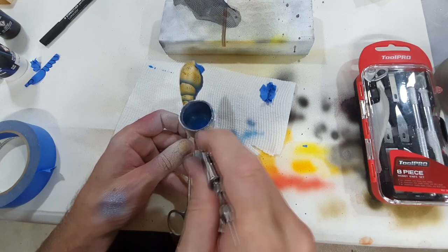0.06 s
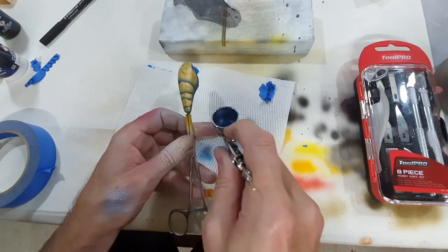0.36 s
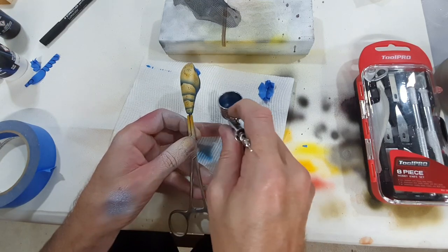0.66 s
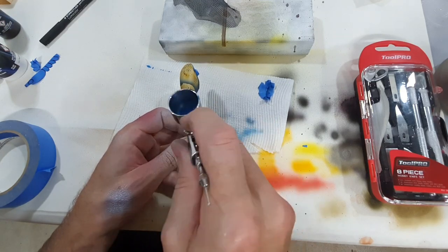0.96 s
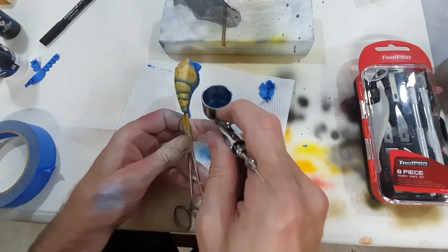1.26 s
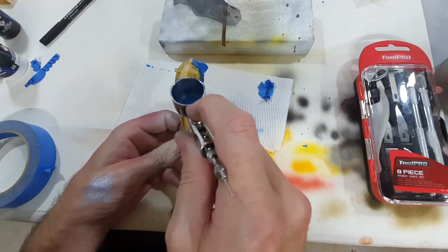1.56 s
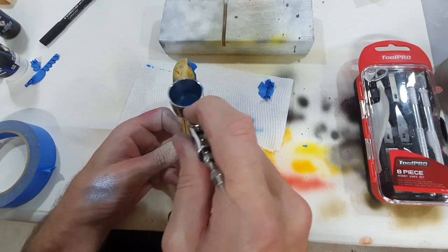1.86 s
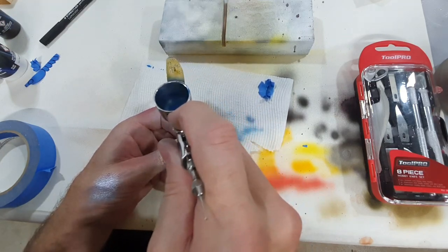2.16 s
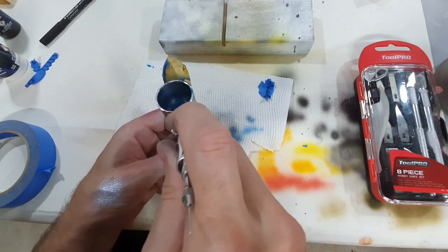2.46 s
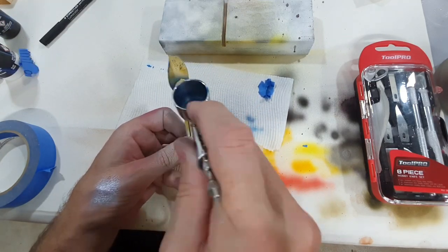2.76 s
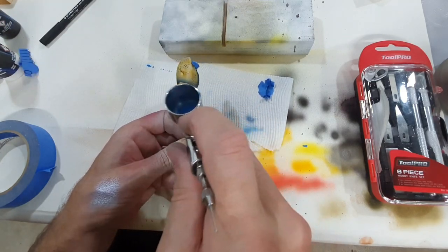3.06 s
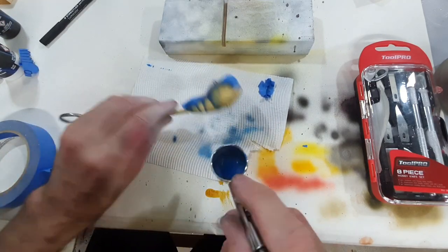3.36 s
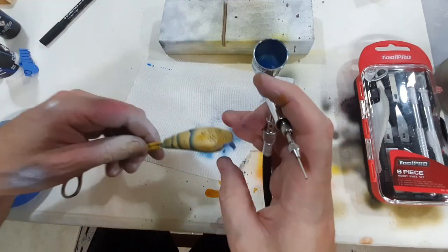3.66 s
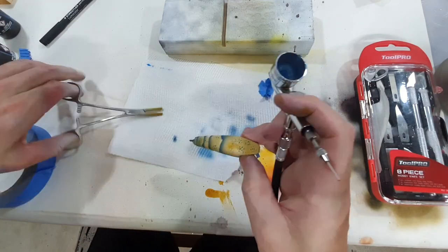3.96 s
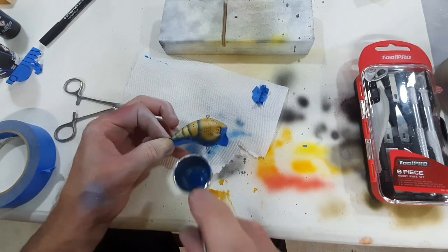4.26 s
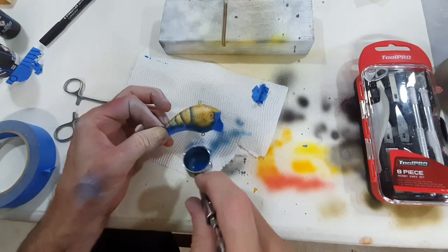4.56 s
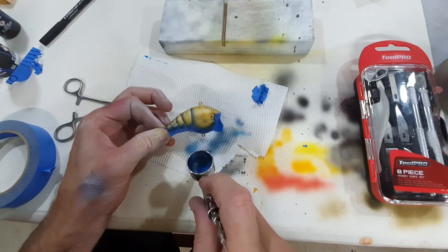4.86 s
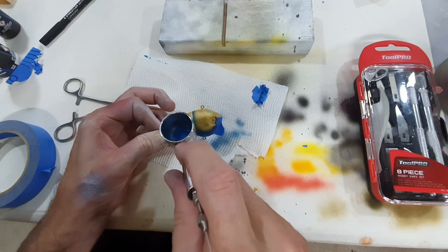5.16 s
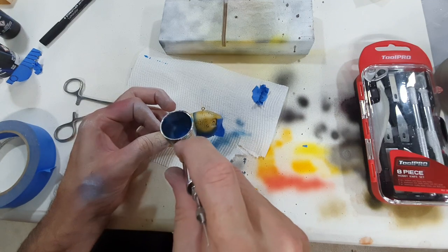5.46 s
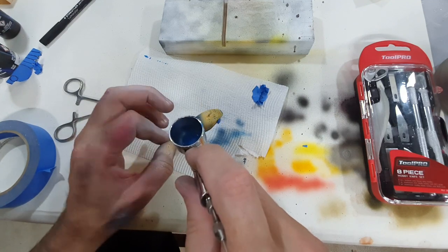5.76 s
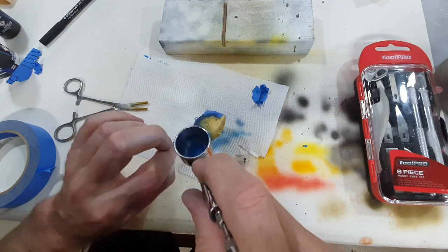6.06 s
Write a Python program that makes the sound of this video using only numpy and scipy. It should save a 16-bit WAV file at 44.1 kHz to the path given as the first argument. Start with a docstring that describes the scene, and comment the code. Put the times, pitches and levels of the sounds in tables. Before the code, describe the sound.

A small airbrush sprays a fishing lure at a workbench, heard close up. Its thin, trembling hiss swells into a louder, slightly hollow rush on each pass. After two presses of the trigger it pauses: fingers tick and rub, and steel forceps land with a knock and a tiny squeak. Two more presses follow, each starting with a spurt of air. A compressor drones quietly throughout.

```python
"""An airbrush sprays a small fishing lure at a workbench, in four presses of the trigger.
The free jet of air hisses thinly. On each pass over the lure it rushes louder, sounds lower the more
squarely it hits, and rings the hollow between lure and fingers. In the pause, fingers tick and rub,
and steel forceps are laid on the bench. A compressor drones throughout; its pump strokes make the
hiss tremble."""
import sys
import numpy as np
from scipy import signal
from scipy.fft import rfft, irfft, next_fast_len
from scipy.io import wavfile
from scipy.ndimage import uniform_filter1d, map_coordinates

SR = 44100
rng = np.random.default_rng(int(sys.argv[2]) if len(sys.argv) > 2 else 0)


def output_pcm(signal):
    """Save a mono or channel-first signal as 16-bit PCM at the path in sys.argv[1].

    Samples are clipped to [-1, 1] before scaling.
    """
    pcm = np.clip(np.atleast_2d(signal).T, -1, 1) * 32767
    wavfile.write(sys.argv[1], SR, np.round(pcm).astype(np.int16))


N = 273861
T = np.arange(N) / SR

# The hollow's two pitches, which shift as the hands move: time_s, lower_hz, upper_hz
HOLLOW_PITCHES = [(0, 2350, 4000), (.25, 2150, 4150), (.36, 2400, 4100), (.46, 2400, 4100),
                  (.92, 2640, 4560), (1.17, 2500, 4420), (1.42, 2450, 4150), (2.25, 2600, 4100),
                  (2.6, 2400, 3850), (3.08, 2650, 3900), (4.36, 2650, 4350), (5.05, 2580, 4700),
                  (5.5, 2550, 4800), (5.8, 2400, 4600), (6.0, 2350, 4500), (6.12, 2340, 4700)]
LOWER_WIDTH, UPPER_WIDTH = .25, .21  # width of each ring, as a share of its pitch


def amp(db):
    """Turn decibels into a gain."""
    return 10 ** (np.asarray(db) / 20)


def unit(x):
    """Scale a signal to an average (rms) strength of 1."""
    return x / np.sqrt(np.mean(x ** 2) + 1e-20)


def along(points, hz):
    """Read a table of pitch_hz, value at any pitch, on a log scale."""
    pitches, values = np.transpose(points)
    return np.interp(np.log(hz + 1), np.log(pitches), values)


def curves(rows):
    """Turn each column after the time into one value per sample."""
    times, *columns = np.transpose(rows)
    return [np.interp(T, times, column) for column in columns]


def wobble(rate):
    """A smooth random curve through `rate` random values a second."""
    return map_coordinates(rng.standard_normal(int(N * rate / SR) + 4), [T * rate])


def gate(start, end, rise, fall):
    """A soft switch from 0 to 1 and back; all times in seconds."""
    return (1 + np.tanh((T - start) / rise)) * (1 - np.tanh((T - end) / fall)) / 4


def burst(peak_s, rise_s, fade_s):
    """A quick swell up to peak_s, then a fall of 60 dB in fade_s."""
    return np.exp(np.minimum(T - peak_s, 0) / rise_s) * amp(-60 * np.maximum(T - peak_s, 0) / fade_s)


def tone(hz):
    """A pure tone whose pitch is given for every sample."""
    return np.sin(2 * np.pi * np.cumsum(hz, axis=-1) / SR)


def filtered(x, response):
    """Scale each frequency in x by response(frequency)."""
    size = next_fast_len(N + 8192)
    return irfft(rfft(x, size) * response(np.fft.rfftfreq(size, 1 / SR)), size)[..., :N]


def resonance(f, hz, width):
    """How something that rings at hz answers frequency f; squaring it makes the peak steeper."""
    return 1j * f * width / (hz * hz - f * f + 1j * f * width)


def noise(colour, likeness=None, lead=None):
    """Stereo noise of strength 1, shaped by colour(frequency), as two microphones pick it up."""
    # How alike left and right are for a nearby sound: pitch_hz, likeness (1 = the same)
    near_likeness = [(100, .99), (300, .9), (600, .65), (1200, .58), (1900, .6), (3000, .48), (8000, .33),
                     (15000, .33)]
    # How much sooner it reaches the left side: pitch_hz, lead_samples
    near_lead = [(100, 5.8), (800, 2.5), (1250, 4.8), (1750, 8.3), (2500, 5.2), (3200, 2.84), (4000, 6.6),
                 (15000, 6.55)]
    # How much louder the left side is: pitch_hz, left_db
    balance = [(100, -0.5), (500, 2.5), (2500, 1.5), (3600, 0.5), (5000, 1.5), (6500, 1.5), (7400, 2),
               (7950, 8), (8800, 5), (10500, 2), (13800, 4), (15800, 7)]
    likeness = near_likeness if likeness is None else likeness
    lead = near_lead if lead is None else lead
    size = next_fast_len(N)
    f = np.fft.rfftfreq(size, 1 / SR)
    common, opposed = rfft(rng.standard_normal((2, size)))
    angle = np.arccos(np.clip(along(likeness, f), -1, 1)) / 2
    side = np.array([[1], [-1]])
    pair = np.cos(angle) * common + side * np.sin(angle) * opposed
    gain = amp(side * along(balance, f) / 2)
    time_shift = np.exp(1j * np.pi * side * f * along(lead, f) / SR)
    return unit(irfft(pair * gain * time_shift * colour(f), size)[:, :N])


def shaped_noise(spectrum):
    """Stereo noise that follows a table of pitch_hz, level_db."""
    return noise(lambda f: amp(along(spectrum, f)))


def band_noise(hz, width):
    """Stereo noise around one pitch; width is a share of that pitch."""
    return noise(lambda f: resonance(f, hz, width * hz))


def compressor(stroke):
    """The pump's housing and rumble tremble with its strokes, over a wavering hum and faint intake air."""
    # The swells of the drone: time_s, level_db
    swells = [(0, -52), (.6, -45.5), (1.25, -47.5), (2.6, -48), (2.85, -47), (3.22, -47), (3.32, -43.5),
              (3.97, -42.5), (4.09, -47), (4.25, -42), (4.7, -47)]
    # Where the housing rings: pitch_hz, width_hz, level_db
    housing_rings = [(283.6, 60, -4), (570, 188, -4), (775, 23, -4), (1123, 92, -3.5), (1215, 62, 0),
                     (1295, 43, 0), (1537, 130, -2.5), (1655, 41, 1), (1726, 120, .5), (1844, 58, -1),
                     (1945, 35, 2.5)]
    # The drone fills the room, so its two sides are less alike: pitch_hz, likeness (1 = the same)
    room_likeness = [(100, .99), (400, .9), (700, .55), (1200, .35), (1700, .4), (2100, .15)]
    # How much sooner it reaches the left side: pitch_hz, lead_samples
    room_lead = [(450, 5), (750, -4), (1300, -8), (1650, 9)]
    # Colour of the low rumble: pitch_hz, level_db
    rumble_colour = [(20, -11), (40, -5), (65, 1), (98, 1), (130, -5.5), (170, -10.5), (230, -2),
                     (285, -5.5), (370, -12), (520, -3.5), (740, -9), (860, -10.5), (1900, -17),
                     (2200, -50)]
    # Tones of the hum: pitch_hz, level_db
    hum_tones = [(88, -69), (279.9, -67), (586, -67), (1184, -61.5), (1215, -59.5), (1297, -61),
                 (1667, -58), (1857, -65)]
    # Colour of the air drawn in: pitch_hz, level_db
    intake_colour = [(1200, -51), (2100, 6.5), (2800, 0.5), (4000, -5), (6300, -11.5), (7800, -22),
                     (9300, -17), (12000, -21), (15800, -38)]

    def housing_colour(f):
        """All the housing's rings together, cut off steeply above 1950 Hz."""
        power = sum(abs(amp(db) * resonance(f, hz, 1.42 * width) ** 2) ** 2
                    for hz, width, db in housing_rings)
        return np.sqrt(power) / np.hypot(1, (f / 1950) ** 60)

    level_db, = curves(swells)
    swell_db = level_db - level_db.mean()
    housing = amp(level_db - .8 + 2.5 * stroke) * noise(housing_colour, room_likeness, room_lead)
    rumble = amp(-54.5 + .47 * swell_db + 1.3 * stroke) * shaped_noise(rumble_colour)
    speed = 1 + .002 * wobble(7)
    hum = sum(amp(db + .75 * swell_db + 2 * wobble(8)) * tone(hz * speed) for hz, db in hum_tones)
    intake = amp(-61.5 + .63 * swell_db) * shaped_noise(intake_colour)
    return housing + hum + rumble + intake


def fingers():
    """Fingers tick and rub on the lure and the airbrush, and slide as they change grip."""
    # Small ticks and rubs: time_s, level_db, pitch_hz, fade_s
    touches = [(3.368, -54, 2800, 0.21), (3.39, -48, 3050, 0.07), (3.448, -63, 7000, .03),
               (3.596, -58, 4500, .04), (3.65, -41, 9300, 0.012), (3.66, -56, 4900, .13),
               (3.686, -52, 3480, 0.088), (3.905, -60, 7900, .073), (3.999, -51.5, 6000, 0.15),
               (4.063, -61, 7000, .012), (4.181, -57, 4500, .11)]
    # Colour of sliding skin: pitch_hz, level_db
    skin_colour = [(1500, -14), (3500, 9), (7000, -5), (12000, -5), (15800, -11)]
    grit = unit(amp(3 * wobble(900)))
    ticks = sum(amp(db) * burst(s, .0008, fade_s) * band_noise(hz, width=.3)
                for s, db, hz, fade_s in touches)
    sliding = gate(start=3.58, end=3.855, rise=.03, fall=.008)
    slide = amp(-64.5 + 2.7 * wobble(29.4)) * sliding * shaped_noise(skin_colour)
    return grit * (ticks + slide)


def forceps():
    """The steel squeaks as it slides, while its two finger rings knock on the bench."""
    # Brief squeaks of the steel: pitch_hz, level_db, waver_hz, start_s, end_s
    squeaks = [(10300, -42, 260, 4.016, 4.032), (13130, -33.5, 50, 4.019, 4.038),
               (14350, -38.5, 60, 4.017, 4.029)]
    # The finger rings land: time_s, knock_db, thud_db
    landings = [(4.0225, -33.5, -46), (4.031, -32, -45.5)]
    # Colour of a knock on the bench: pitch_hz, level_db
    bench_colour = [(25, -26), (100, 2), (200, -5.5), (400, -13), (800, -22), (1300, 5.5), (2200, -4),
                    (4000, -8), (7000, -22.5), (12000, -22), (15000, -14)]
    squeak = 0
    for hz, db, waver_hz, start, end in squeaks:
        pitch_hz = hz + waver_hz * np.array([wobble(700), wobble(640)])
        squeak += amp(db) * gate(start, end, rise=.0033, fall=.0052) * tone(pitch_hz)
    lean_left, thud_hz = amp([[3], [-3]]), 102.2
    knock = sum(amp(db) * burst(s, rise_s=.0042, fade_s=.044) for s, db, _ in landings)
    thud = sum(amp(db) * burst(s, rise_s=.0086, fade_s=.11) for s, _, db in landings)
    return lean_left * squeak + knock * shaped_noise(bench_colour) + thud * np.sin(2 * np.pi * thud_hz * T)


def nearby_echoes(x, share, spread_s):
    """Things around the bench send back a dozen weak echoes on each side."""
    draws = rng.random((2, 12, 2))
    echoes = np.zeros((2, SR // 20))
    for channel, (lateness, flip) in zip(echoes, draws.transpose(0, 2, 1)):
        delay_s = (1 + 9 * lateness) / 10 * spread_s
        channel[(delay_s * SR).astype(int)] = np.sign(flip - .5) * np.exp(-lateness)
    echoes /= np.linalg.norm(echoes, axis=1, keepdims=True)
    reflected = signal.fftconvolve(x, echoes, axes=1)[:, :N]
    return (x + share * reflected) / np.sqrt(1 + share ** 2)


def bench_echo(x, share, top_hz):
    """One close echo off the bench makes the hiss sound hollow; paper soaks up the echo's treble."""
    # The echo's delay as the nozzle rises and sinks: time_s, delay_ms
    delays = [(0, 1.2), (.9, 1.16), (1.2, 1.17), (1.45, 1.24), (1.75, 1.26), (2, 1.22), (2.25, 1.18),
              (2.55, 1.03), (2.78, 1.0), (3.1, 1.05), (4.35, 1.15), (5.1, 1.2), (5.6, 1.22), (6.2, 1.22)]
    read_at = (T - curves(delays)[0] / 1000) * SR
    dull = filtered(x, lambda hz: 1 / np.hypot(1, (hz / top_hz) ** 2))
    return x + share * np.array([map_coordinates(channel, [read_at]) for channel in dull])


def moving_hands(x, depth_db):
    """The moving hands colour the sound in slow, random patches."""
    spectra = signal.stft(x, nperseg=512)[2]
    patches = rng.standard_normal(spectra.shape)
    for _ in range(2):
        patches = uniform_filter1d(patches, size=5, axis=1)  # smooth over pitch
        patches = uniform_filter1d(patches, size=40, axis=2)  # smooth over time
    patches = unit(patches + patches.mean(axis=0))
    return signal.istft(spectra * amp(depth_db * patches), nperseg=512)[1][:, :N]


def stray_air():
    """Air at the fringe of the jet sings over the lure, fingers and paper that it brushes."""
    # Each brush of air: start_s, end_s, pitch_hz, width_hz, level_db
    brushes = [(.1, .33, 2930, 700, -46), (0.364, .47, 6600, 1300, -47), (.47, 0.823, 5900, 1900, -48),
               (0.804, 0.88, 1890, 900, -38.5), (2.31, 2.427, 1670, 700, -42.5),
               (4.6, 4.955, 4560, 2000, -45.5), (5.15, 5.6, 3400, 300, -52),
               (5.715, 6.08, 3430, 450, -44.5), (5.7, 6.21, 7000, 800, -49)]
    return sum(amp(db) * gate(start, end, rise=.011, fall=.011)
               * noise(lambda f: resonance(f, hz, width) ** 2)
               for start, end, hz, width, db in brushes)


def hollow_ring(hz, width):
    """Air rings in the hollow between lure and fingers: noise around a moving pitch."""
    f, times, spectra = signal.stft(noise(np.ones_like), SR, nperseg=512)
    centre_hz = np.interp(times, T, hz)
    peak = abs(resonance(f[:, None], centre_hz, width * centre_hz)) ** 2
    return unit(signal.istft(spectra * peak, nperseg=512)[1][:, :N])


def air_spurts():
    """Air spurts as the valve opens or the trigger is jerked, and rings the hollow."""
    # Each spurt: time_s, level_db, pitch_hz, fade_s, ring_db (compared with the spurt)
    spurts = [(.915, -30, 4820, 0.085, -15), (1.232, -40.5, 2900, .1, -12), (1.41, -31.5, 4800, 0.35, -7),
              (4.347, -29, 3070, 0.17, -6), (4.562, -31, 3220, 0.13, -7), (5.041, -24, 4000, 0.097, -4.5),
              (6.125, -40.5, 2350, 0.12, 10)]
    hollow = hollow_ring(curves(HOLLOW_PITCHES)[0], LOWER_WIDTH)
    return sum(amp(db) * burst(s, .016, fade_s) * (band_noise(hz, width=.69) + amp(ring_db) * hollow)
               for s, db, hz, fade_s, ring_db in spurts)


def jet_on_lure():
    """Each pass turns hiss into rush: bright when it grazes, low when head-on. The hollow rings along."""
    # Passes over the lure: start_s, end_s, rush_db, growth_db (as the nozzle comes closer),
    # hiss_change_db, lower_ring_db, upper_ring_db
    passes = [(-.1, 0.11, -41.5, -1, 2, -49, -51), (.105, 0.341, -38, 3, 1, -47, -41.5),
              (0.356, 0.462, -39, 0, -0.5, -41, -42), (0.871, 1.203, -36.5, -1.5, 2.5, -42, -40.5),
              (1.342, 2.291, -36, 3.5, -0.7, -49.5, -42), (2.291, 2.45, -37, 2, -1, -47, -45),
              (2.45, 2.814, -34.5, -1.5, 1, -62, -45), (2.87, 3.162, -34.5, 6.5, 0.5, -52, -42),
              (4.31, 4.58, -37.5, 5.5, 1, -58, -50), (5.02, 5.63, -38, 2, 1.5, -45.5, -46),
              (5.63, 6.3, -36.5, 0, 0.5, -43.5, -47)]
    # How squarely the jet hits: time_s, squareness (0 = grazing, 1 = head-on)
    aim = [(0, 0.82), (.31, 0.6), (.42, 0.47), (.89, 0.64), (.97, 0.086), (1.19, 0.32), (1.38, 0.55),
           (1.5, 0.09), (1.82, 0.2), (2.25, 0.44), (2.38, 0.78), (2.49, 0.43), (2.77, 0.18), (2.9, 0.58),
           (3.1, 0.085), (4.36, 0.87), (4.51, 0.77), (4.58, 0.072), (5.06, 0.7), (5.54, 0.81), (5.7, 0.33),
           (6.2, 0.7)]
    # Colour of the free jet: pitch_hz, level_db
    hiss_colour = [(500, -34), (2200, -8), (3500, -4.5), (4800, -1.5), (6800, -2.5), (8000, -5.5),
                   (9000, -2.5), (10300, 0), (12000, -0.5), (15800, -2.5)]
    # Colour of air on the lure's edge: pitch_hz, level_db
    edge_colour = [(1200, -22), (2500, -5), (3100, -3), (4200, 1), (5100, 0), (5800, 0.5), (7200, -5.5),
                   (9500, -6.5), (11500, -15.5), (15500, -29)]
    # Colour of air on the lure's face: pitch_hz, level_db
    face_colour = [(200, -36), (500, -19.5), (850, -7.3), (1200, -3), (1600, -2), (2000, 0.6), (3050, -3.5),
                   (4500, -2), (7000, -36), (12000, -44)]
    squareness = np.clip(curves(aim)[0], 0, 1)
    hiss_db, blocked_db = -34, -6.5  # the free jet; its drop when the lure is squarely in the way
    rush = lower = upper = 0
    for start, end, rush_db, growth_db, hiss_change_db, lower_db, upper_db in passes:
        on_lure = gate(start, end, rise=.007, fall=.007)
        hiss_db += on_lure * (hiss_change_db + blocked_db * squareness)
        contact = on_lure * amp(growth_db * np.interp(T, [start, end], [-.5, .5]))
        rush += amp(rush_db) * contact
        lower += amp(lower_db) * contact
        upper += amp(upper_db) * contact
    lower_hz, upper_hz = curves(HOLLOW_PITCHES)
    hollow = lower * hollow_ring(lower_hz, LOWER_WIDTH) + upper * hollow_ring(upper_hz, UPPER_WIDTH)
    hiss = amp(hiss_db) * shaped_noise(hiss_colour)
    edge = rush * amp(np.interp(squareness, [0, 1], [3, -4.5])) * shaped_noise(edge_colour)
    face = rush * amp(np.interp(squareness, [0, 1], [-8.5, 4.5])) * shaped_noise(face_colour)
    return hiss + edge + face + hollow


def airbrush(stroke):
    """The trigger lets the air out, which spurts and trembles with the pump's strokes."""
    # Trigger presses: open_s, close_s, rise_s, fall_s, left_db (compared with the right)
    presses = [(-.1, 2.786, .005, .008, .4), (2.895, 3.106, .014, .016, .5),
               (4.334, 4.949, .007, .0072, 1.7), (5.036, 6.43, .0046, .009, 1.8)]
    # The finger eases off for a moment: start_s, end_s, flow_change_db
    eases = [(-.1, 0.104, -0.5), (0.317, 0.5, -3), (0.8, 0.903, -4), (1.192, 1.357, -9), (2.85, 2.93, -0.5),
             (4.578, 4.613, -5.5)]
    sides = np.array([[.5], [-.5]])
    valve = sum(gate(*timing) * amp(sides * left_db) for *timing, left_db in presses)
    flow_db = sum(db * gate(start, end, rise=.0043, fall=.0043) for start, end, db in eases)
    tremble_db = stroke * (1.45 + .5 * wobble(18)) + .89 * wobble(25)
    spurts = air_spurts()
    stream = amp(flow_db + tremble_db) * (jet_on_lure() + stray_air())
    return valve * moving_hands(stream + spurts, depth_db=1.52)


def scene():
    """The sounds at the bench, with the compressor behind; its strokes shake both spray and drone."""
    stroke_hz = 42.8 * (1 + .055 * wobble(9))
    stroke = tone(stroke_hz)
    spray = bench_echo(airbrush(stroke), share=.14, top_hz=5500)
    spray = nearby_echoes(spray, share=.2, spread_s=.012)
    return spray + fingers() + forceps() + compressor(stroke)


def record(dry):
    """Cut off the very highest treble."""
    top_hz = 15850
    return filtered(dry, lambda hz: (1 - np.tanh((hz - top_hz) / 60)) / 2)


dry = scene()
out = record(dry)
output_pcm(out)
```